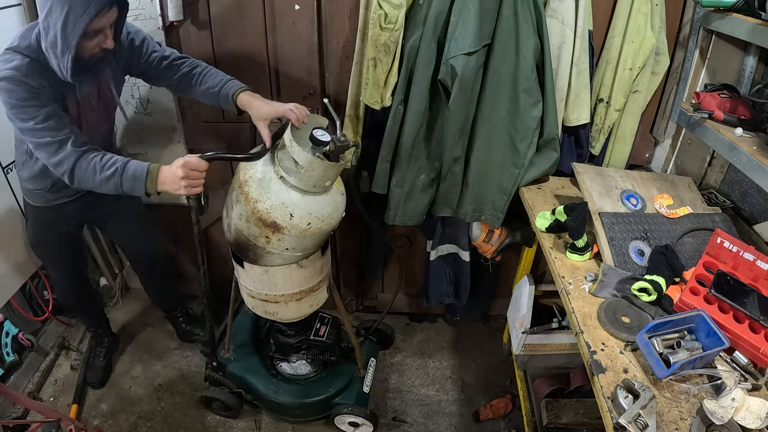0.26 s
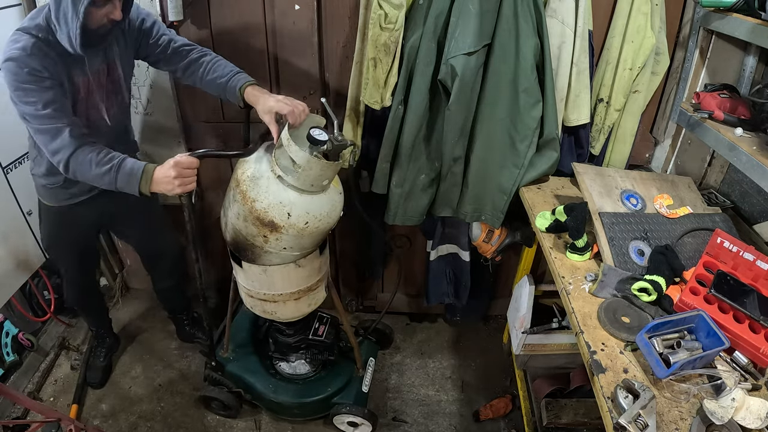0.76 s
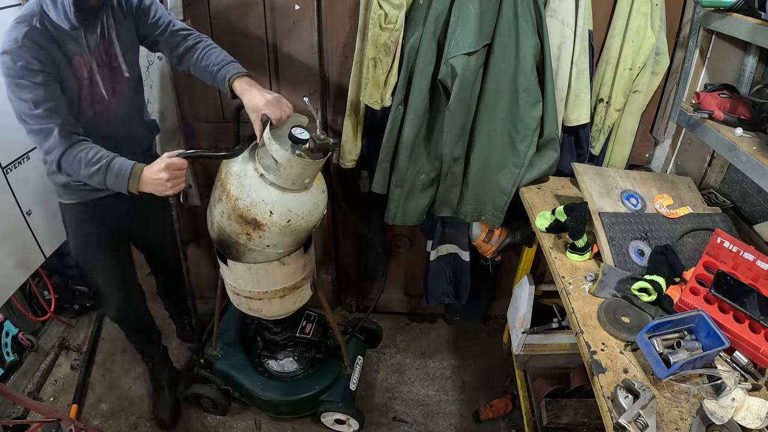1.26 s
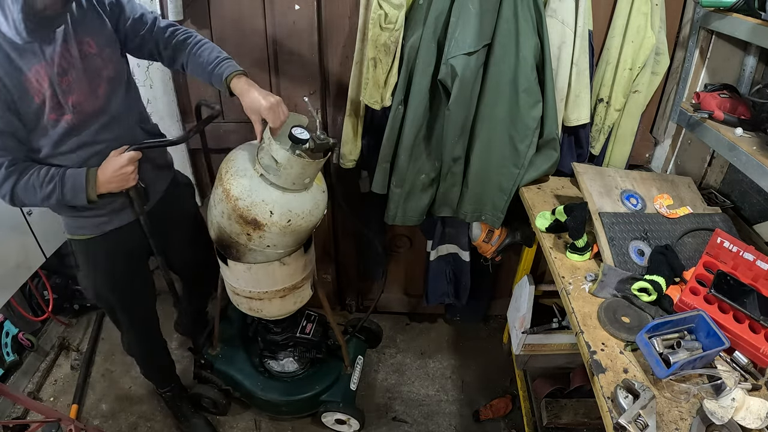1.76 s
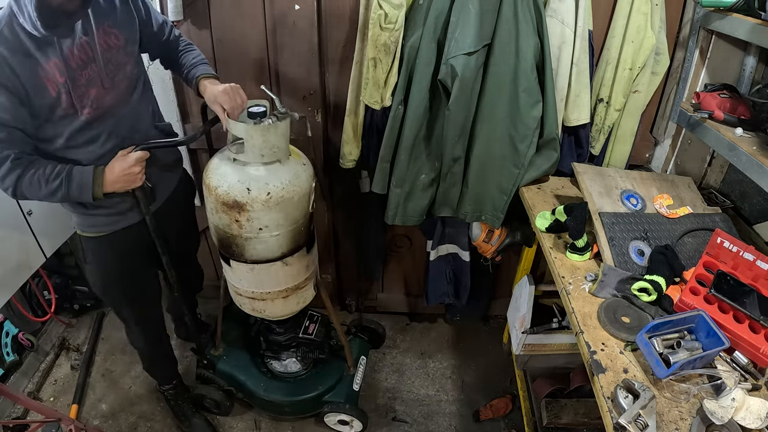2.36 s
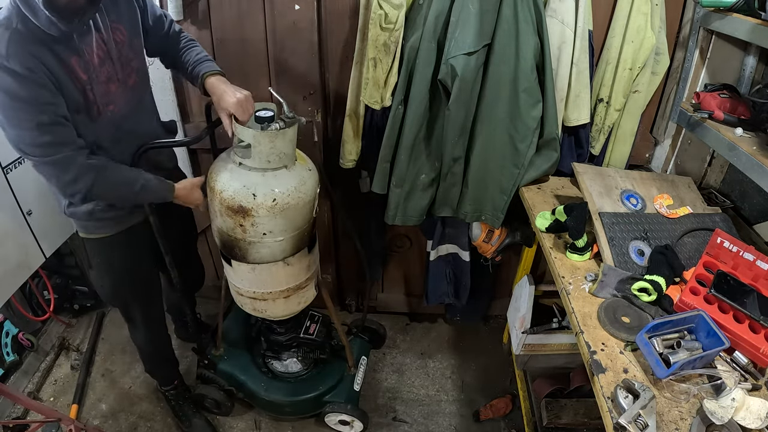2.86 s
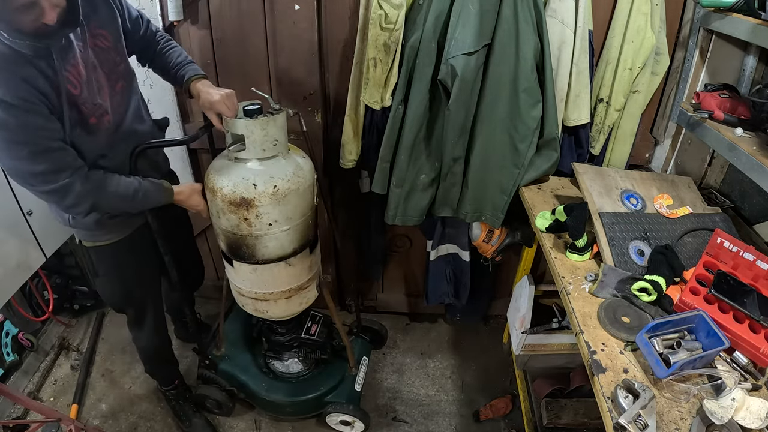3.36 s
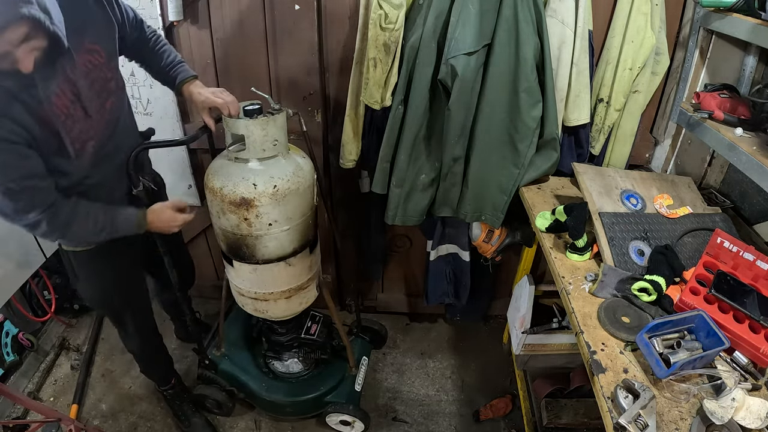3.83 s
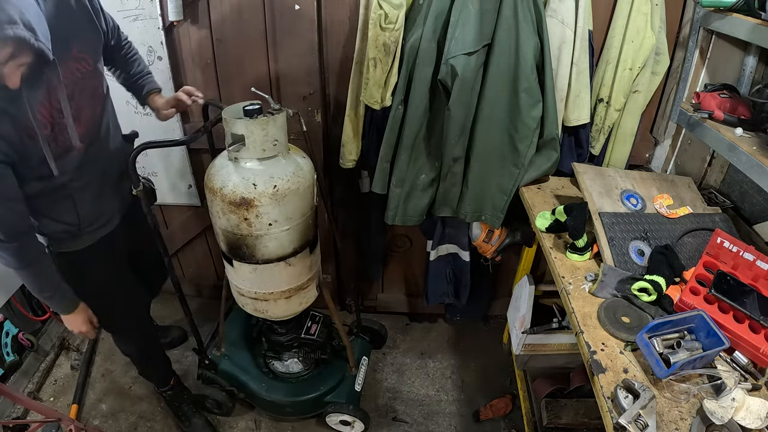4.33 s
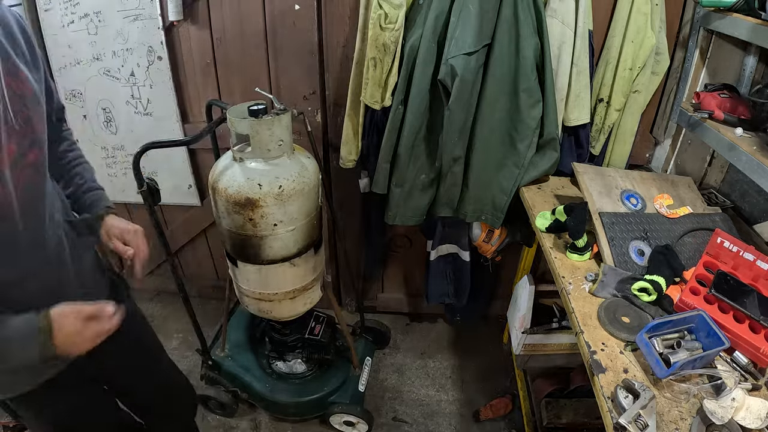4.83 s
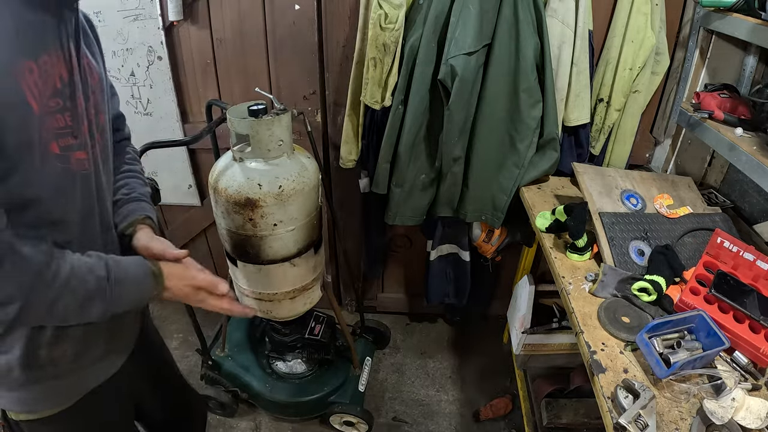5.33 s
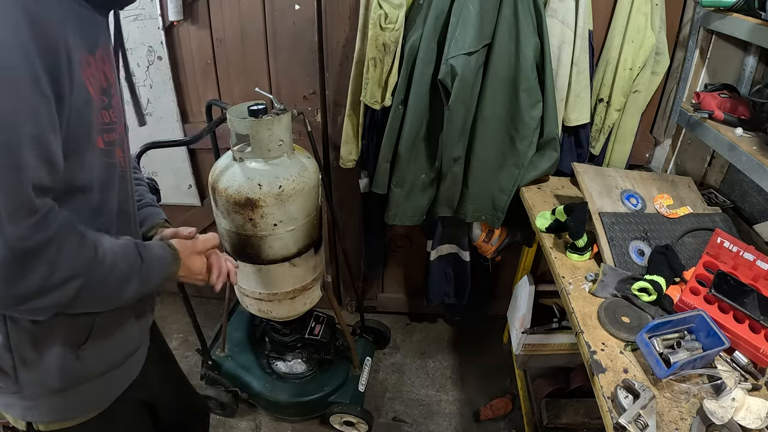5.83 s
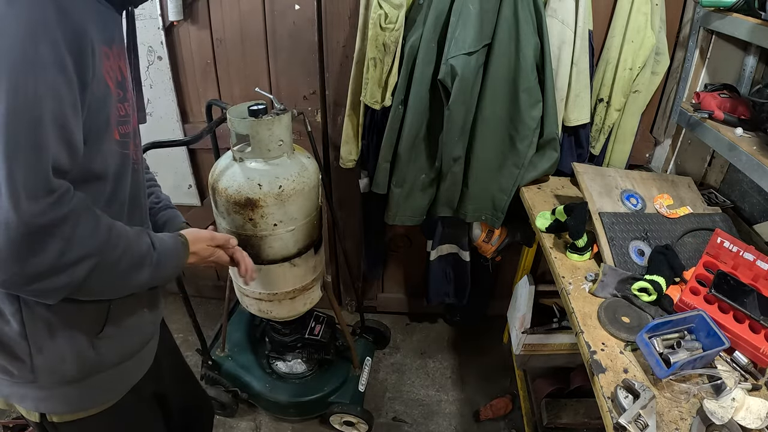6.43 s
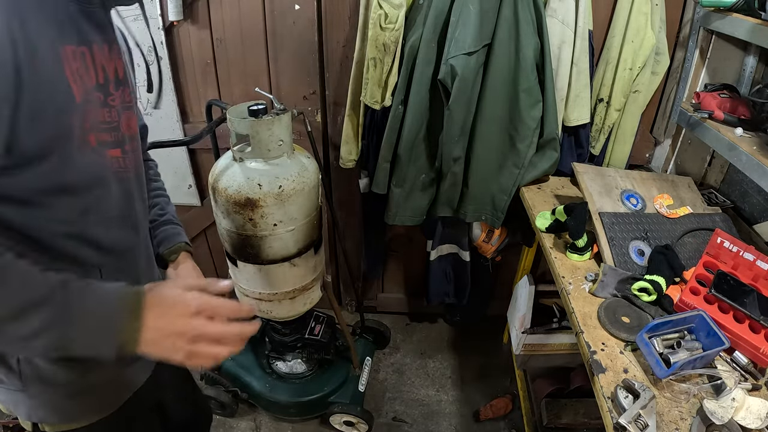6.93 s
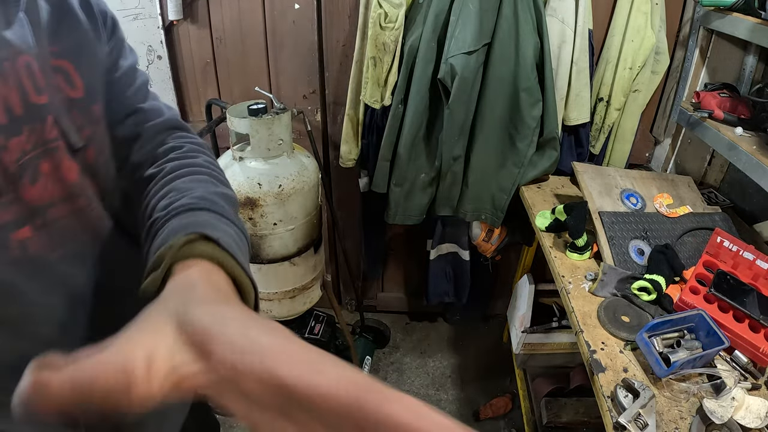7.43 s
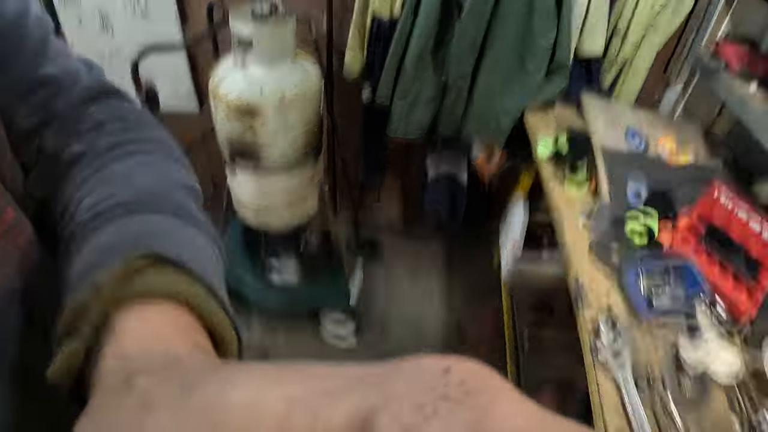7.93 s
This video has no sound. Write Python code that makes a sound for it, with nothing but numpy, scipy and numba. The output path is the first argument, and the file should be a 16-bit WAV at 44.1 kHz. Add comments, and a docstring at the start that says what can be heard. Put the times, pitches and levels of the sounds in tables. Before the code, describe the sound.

Rapid breathy puffs of compressed air from a small engine chug, slow and stall into a thin hiss, then a hand bumps the camera.

```python
"""Small mower engine turned over on compressed air

A cluttered workshop, with a one-cylinder mower close to the two microphone ports of a camera.
Each valve opening lets out a puff of jet noise that rings the muffler, while the rising piston glides
the cylinder's resonances, mostly upward. Thumps, low shaking and dull knocks come from the machine.
The strokes slow down, the engine stalls and hisses past its valve, and a hand grips the camera.
"""
import sys
import numpy as np
from scipy import signal
from scipy.fft import rfft, irfft
from scipy.io import wavfile
from scipy.ndimage import uniform_filter1d
from numba import njit

SR = 44100
rng = np.random.default_rng(int(sys.argv[2]) if len(sys.argv) > 2 else 0)


def materialize(psi):
    """Save the field psi as 16-bit PCM at rate SR to the path in sys.argv[1].

    A 1-D psi becomes a single channel; in a 2-D psi each row is a channel.
    """
    bounded = np.clip(np.atleast_2d(psi).T, -1, 1)
    quanta = np.round(bounded * 32767).astype(np.int16)
    wavfile.write(sys.argv[1], SR, quanta)


N = 360815
T = np.arange(N) / SR  # time [s]

# Valve openings, the two kinds of stroke in turn.
# Each row: start in seconds, open time in seconds, thump level in dB.
PUFFS = [(-0.146, 0.17, -58), (0.091, 0.16, -36), (0.346, 0.15, -30), (0.557, 0.17, -52),
         (0.818, 0.15, -34), (1.034, 0.17, -41), (1.297, 0.15, -27), (1.503, 0.16, -34), (1.757, 0.15, -32),
         (1.966, 0.18, -39), (2.224, 0.15, -26.5), (2.437, 0.17, -38), (2.701, 0.15, -28),
         (2.923, 0.17, -43), (3.196, 0.16, -31), (3.416, 0.19, -33), (3.72, 0.15, -32), (3.941, 0.19, -41),
         (4.234, 0.16, -30), (4.46, 0.19, -40), (4.76, 0.12, -39), (4.974, 0.36, -48), (5.58, 0.17, -37),
         (5.844, 0.46, -47), (6.547, 0.17, -39), (6.814, 0.44, -48)]
# The two kinds of stroke. Each row: nominal sag of the flow as the valve nears its seat in dB,
# displaced air relative to the jet in dB (before its final gain), air lost in dB per halving of speed.
STROKES = [(7.5, -12, 5), (2.5, -14.5, 12.5)]
# Muffler resonances over the jet. Each row: centre in Hz, nominal width in Hz, relative level in dB.
MUFFLER = [(1740.3, 38, 4), (1887, 13.3, -3.5), (2103, 41, -9), (2535, 57, -1), (2470, 15, -4.5),
           (4182, 68, -9.5), (4890, 20, -15), (5620, 42, -12), (5930, 30, -12.5), (6277, 67, -15.5),
           (6570, 60, -12.5), (7426, 250, -14.5), (7880, 230, -19.5), (9700, 98, -19), (9750, 250, -29.5),
           (10900, 210, -22.5), (11850, 175, -22), (12300, 250, -45)]
# Jet noise between the resonances. Each row: frequency in Hz, relative level in dB.
JET_COLOUR = [(1000, -38.5), (1550, -42), (1700, -5.5), (2050, -13.5), (2250, -13.5), (2700, -14.5),
              (3000, -26.5), (4100, -23), (7800, -29), (8600, -29.5), (9500, -26), (12500, -36.5),
              (14000, -42.5), (15700, -62)]
# Cylinder resonances in the jet. Each row: centre with piston down in Hz, centre with piston up in Hz,
# width in Hz before the filters widen it, relative level in dB.
CYLINDER = [(1872, 1993, 45, -2), (3930, 4350, 230, 5.5), (4555, 5100, 85, 6), (5370, 6310, 210, 6),
            (4960, 7700, 140, -7.5), (5800, 6800, 210, 0.5), (6596, 7200, 170, 3.5), (7000, 8200, 170, -3),
            (9050, 10400, 290, -1), (10360, 9900, 330, 3), (11500, 11000, 180, 2), (12350, 13000, 260, -1)]
# Quiet band in the puffs. One row: centre with piston down in Hz, centre with piston up in Hz,
# width in Hz, depth of each of two passes from 0 to 1.
QUIET_BAND = (3400, 3750, 900, .95)
# Low resonances of the displaced air. Each row: centre with piston down in Hz, centre with piston up
# in Hz, width in Hz before the filters widen it, relative level in dB.
WHOOP = [(140, 450, 133, -3), (158, 202, 51, -5.5), (342, 320, 170, -5.5), (563, 589, 41, -3.5),
         (570, 1083, 265, -5.5), (1046, 1770, 790, -5.5), (2950, 3500, 1200, -9)]
# Fixed low resonances of deck and tank. Each row: centre in Hz, nominal width in Hz, relative level in dB.
DECK = [(275, 70, 0), (641, 33, -3), (1140, 270, -4)]
# Air seeping past the seat. Each row: start in seconds, sealing time in seconds,
# starting level around 8-13 kHz in dB.
LEAKS = [(5.324, 5.47, -44), (6.304, 6.434, -44), (7.245, 8.3, -43)]
# Smooth colour of the leak. Each row: frequency in Hz, relative level in dB.
LEAK_COLOUR = [(180, -66), (300, -32), (907, -1.5), (1590, -5), (2690, -15), (3810, -4.5), (4210, -13.5),
               (6460, -6), (12100, -18), (15500, -39)]
# Resonances of the leak. Each row: centre in Hz, nominal width in Hz, relative level in dB.
LEAK_PEAKS = [(1810, 140, 5.5), (2030, 170, 2.5), (2486, 100, 0), (5060, 120, -4), (6370, 250, 0.5),
              (7230, 150, -4), (7610, 180, -1), (9310, 290, -2.5), (10150, 310, -8), (11840, 350, -9.5)]
# Last gasps as the slow valve reaches its seat. Each row: start in seconds, level in dB, length in seconds.
GASPS = [(5.419, -30.5, .07), (6.365, -29, 0.099)]
# Dull bumps of frame, tank and feet. Each row: start in seconds, level in dB before the decay,
# centre in Hz, 60 dB decay time in seconds.
BUMPS = [(0.214, -21.5, 189, 0.3), (1.26, -35.5, 380, 0.22), (2.068, -23.5, 274, 1.1),
         (2.664, -32.5, 183, 0.27), (3.292, -30.5, 400, 0.47), (5.575, -38, 85, 0.34),
         (5.588, -25.5, 149, 0.16), (7.347, -42, 200, 0.13), (7.35, -43, 60, 0.2), (7.54, -46, 140, 0.3)]
# Fingers on the camera body. Each row: start in seconds, relative tick level in dB, tick centre in Hz,
# relative thud level in dB.
TAPS = [(7.717, -13, 1190, -27), (7.785, -27, 1740, -33), (7.812, -10.5, 1630, -25), (7.89, -18, 1330, -34),
        (7.919, -14.5, 746, -17.5), (7.97, -33, 1720, -24.5), (8.027, -20.5, 1730, -22),
        (8.046, -16, 972, -22), (8.065, -18.5, 1190, -24), (8.102, -18, 604, -30), (8.122, -16.5, 976, -20)]
# Steady sound of the workshop. Each row: frequency in Hz, relative level in dB.
SHOP_COLOUR = [(30, -4), (100, -34), (400, 6.5), (2000, 6.5), (6000, 6), (15000, -13)]
# Left port minus right port for airborne sound. Each row: frequency in Hz, difference in dB.
PORTS = [(40, -3.5), (130, -2.5), (600, -1), (1500, 1.5), (4500, 1.4), (9000, 1.5), (15000, 4)]
# Dip of the camera housing for airborne sound. Each row: frequency in Hz, gain in dB.
HOUSING = [(65, -0.5), (105, -9), (140, 0.5)]

JET_DB, JET_FALL_DB_S = -21.5, 0.1865  # the tank pressure drops slowly
BRISK_CYCLE_S, LAST_CYCLE_S = 0.51, 0.9  # time over two strokes
STALL_SHUT_DB = 34  # per open time: the stalled crank closes the last valve only slowly
SIZZLE_HZ, SIZZLE_DB, SIZZLE_RISE_DB_S = 13200, -9.5, 0.95  # the top of the jet grows as the strokes slow
# slow strokes clear the gap between the low rings
GAP_HZ, GAP_WIDTH_HZ, GAP_FROM_S, GAP_SHARE = 2250, 220, 4.4, 0.55
THIN_HZ, THIN_SHARE = 190, 0.52  # a risen piston leaves little room for the lowest resonances
SEEP_RISE_S, SEEP_DROOP_DB_S, SEAL_DB_S = 0.07, 1, 500
SHAKE_DB, SHAKE_FALL_DB_S = -44, 5  # shaking of the mower as it slows, before its wavering
ROCK_DB, ROCK_T60_S = -12, 0.55  # rocking after each valve opening, relative to the thump
STILL_DB = -74.5  # low shaking left when the mower stands still
GRIP_S, GRIP_DB = 7.68, -36  # steady hold, before its wavering and the path to each port
GRIP_JOLT_DB, GRIP_T60_S = -6, 0.17  # jolt of the grip with each tap, relative to the thud column
ROOM_T60_S, ROOM_DB, ROOM_LOW_HZ = 0.072, -4.5, 40.6
SHOP_DB = -47.5  # before the ports
TOP_HZ = 15700


def undb(db):
    """Amplitude of a level in dB."""
    return 10 ** (np.asarray(db) / 20)


def unit(x):
    """Signal scaled to an RMS of 1."""
    return x / np.sqrt(np.mean(x ** 2))


def spectrum(points, hz):
    """dB of (Hz, dB) points, straight on a log-frequency axis."""
    f, db = np.transpose(points)
    return np.interp(np.log(hz + 1), np.log(f), db)


def noise(points, peaks=(), peaks_db=0.):
    """Noise coloured by a smooth spectrum plus resonance peaks."""
    hz = np.fft.rfftfreq(N, 1 / SR)
    power = undb(2 * spectrum(points, hz))
    for centre, width, db in peaks:
        skirt = (1 + (2 * (hz - centre) / width) ** 2) ** 1.84
        power = power + undb(2 * (db + peaks_db)) / skirt
    white = rfft(rng.standard_normal(N))
    return irfft(white * np.sqrt(power), N)


@njit
def svf(x, hz, width):
    """State-variable band-pass with a moving centre, gain 1 at the centre."""
    y, b, l = np.empty(len(x)), 0., 0.
    for i in range(len(x)):
        g, k = np.tan(np.pi * hz[i] / SR), width / hz[i]
        v = (b + g * (x[i] - l)) / (1 + g * (g + k))
        b, l, y[i] = 2 * v - b, l + 2 * g * v, k * v
    return y


def band(x, hz, width):
    """Band-pass with a fixed centre."""
    return svf(x, np.full(len(x), 1. * hz), 1. * width)


def walk(rate):
    """Random levels held 1 / rate s and slewed twice; spread near 1."""
    k = int(SR / rate)
    steps = np.repeat(rng.standard_normal(N // k + 1), k)
    return 1.064 * uniform_filter1d(uniform_filter1d(steps, k), k)[:N]


def add(out, s, sound):
    """Mix a short sound into out at s seconds."""
    i = int(s * SR)
    out[i:i + len(sound)] += sound[:N - i]


def jolts(events, t60, rise_s):
    """Gain that swells at each (s, dB) and dies away."""
    starts, db = np.array(events).T
    t = np.maximum(T[:, None] - starts, 0)
    return np.clip(t / rise_s, 0, 1) * 1000 ** (-t / t60) @ undb(db)


def gliding(source, modes, piston, patchy_db):
    """Steep resonances whose pitch follows the piston; each wavers and flares on its own."""
    out = 0
    for down_hz, up_hz, width, db in modes:
        hz = (down_hz + (up_hz - down_hz) * piston) * (1 + 0.026 * walk(14))
        flare = undb(db + patchy_db * walk(22.01))
        # two passes narrow the band, so each is set wider
        once = svf(source, hz, 2.28 * width)
        out = out + flare * svf(once, hz, 2.28 * width)
    return out


def valve(rise_s=0.023, shut_db=55, whoop_lag_s=0.098):
    """Controls of all strokes: jet level, flow, displaced-air gain, piston height 0-1."""
    flow_db, air, piston = np.full(N, -90.), np.zeros(N), np.ones(N)
    jet_db = JET_DB - JET_FALL_DB_S * T
    times = np.array(PUFFS)[:, 0]
    cycles = np.r_[BRISK_CYCLE_S, times[2:] - times[:-2], LAST_CYCLE_S]
    for k, (s, open_s, _) in enumerate(PUFFS):
        sag_db, air_db, lost_db = STROKES[k % 2]
        air_db = air_db - lost_db * np.log2(cycles[k] / BRISK_CYCLE_S)
        if k == len(PUFFS) - 1:
            shut_db = STALL_SHUT_DB
        on = T >= s
        t = T[on] - s
        u = t / open_s
        # the cam lifts the valve, the flow sags as it nears its seat, and a slow crank pinches it off slowly
        lift = 35 * np.log10(np.clip(t / rise_s, 1e-4, 1))
        sag = sag_db * np.clip(u, 0, 1) ** 7.3
        pinch = shut_db * np.maximum(u - 1, 0)
        shape = lift - sag - pinch
        flow_db[on] = np.maximum(shape, -90)
        lag = 1 - 0.42 * np.exp(-t / whoop_lag_s)
        air[on] = undb(jet_db[on] + air_db + 0.55 * shape) * lag
        piston[on] = np.sin(np.pi / 2 * np.clip(t / (0.97 * open_s), 0, 1)) ** 2.05
    return jet_db, flow_db, air, piston


def jet_noise(piston):
    """Turbulent jet ringing the muffler and the cylinder, at a steady mean level."""
    muffled = noise(JET_COLOUR, MUFFLER, peaks_db=-1.)
    cylinder = gliding(muffled, CYLINDER, piston, patchy_db=5.0)
    jet = unit(muffled + cylinder) * undb(1.09 * walk(30))
    jet = jet + undb(SIZZLE_DB + SIZZLE_RISE_DB_S * T) * band(jet, SIZZLE_HZ, 3800)
    gap = GAP_SHARE * np.clip(T - GAP_FROM_S, 0, 1)
    return jet - gap * band(jet, GAP_HZ, GAP_WIDTH_HZ)


def displaced_air(piston):
    """Air pushed out by the piston, sounding low resonances that move with its height."""
    push = noise([(60, -49), (150, -11), (1500, -2.0), (15000, -0.5)], DECK, peaks_db=0.5)
    whoop = unit(gliding(push, WHOOP, piston, patchy_db=2.5))
    return whoop - THIN_SHARE * piston ** 3.0 * band(whoop, THIN_HZ, 300)


def engine():
    """Jet and displaced air under valve control, thinned in a quiet band around 3.4-3.75 kHz."""
    jet_db, flow_db, air, piston = valve()
    jet = jet_noise(piston)
    low = signal.sosfiltfilt(signal.butter(2, 3300, fs=SR, output="sos"), jet)
    # treble needs a fast jet, so it dies sooner than the low muffler rings
    out = undb(jet_db) * (low * undb(0.94 * flow_db) + (jet - low) * undb(1.11 * flow_db))
    out += air * displaced_air(piston) * undb(6.5)
    down_hz, up_hz, width, depth = QUIET_BAND
    quiet_hz = down_hz + (up_hz - down_hz) * piston
    # the 3-4 kHz band thins after each puff's onset and partly returns late in it
    thinning = np.clip(np.minimum(0.4 + piston / 0.09, 0.5 + (1 - piston) / 0.15), 0, 1)
    for _ in range(2):
        out = out - depth * thinning * svf(out, quiet_hz, 1. * width)
    return out


def leak():
    """Thin hiss past the valve seat: it swells, droops, and stops when the valve seals."""
    hiss = noise(LEAK_COLOUR, LEAK_PEAKS, peaks_db=4.0)
    hiss /= np.std(band(hiss, hz=10220, width=4740))
    gain = 0
    for s, sealed, db in LEAKS:
        droop = SEEP_DROOP_DB_S * np.maximum(T - s, 0)
        seal = SEAL_DB_S * np.maximum(T - sealed, 0)
        gain = gain + np.clip((T - s) / SEEP_RISE_S, 0, 1) * undb(db - droop - seal)
    return hiss * undb(2.0 * walk(16)) * gain


def gasps():
    """Broad, breathy swells of air noise, without the quiet band of the puffs."""
    colour = [(800, -29), (1750, 20.5), (2500, -13), (4000, -1), (7000, -1), (10000, -32)]
    hiss = unit(noise(colour, LEAK_PEAKS[:3], peaks_db=1.0))
    gain = 0
    for s, db, length in GASPS:
        gain = gain + undb(db) * np.sin(np.pi * np.clip((T - s) / length, 0, 1)) ** 0.81
    return hiss * gain


def thumps(delay_s=0.01):
    """A low pressure thump just after each valve opens, over the shaking of the mower."""
    out, t = np.zeros(N), T[:SR // 10]
    thump = np.sin(2 * np.pi * 48 * t) * np.sin(np.pi * np.clip(t / 0.027, 0, 1)) ** 2
    for s, _, db in PUFFS[1:]:  # the first valve opens before the start
        add(out, s + delay_s, undb(db) * thump)
    shake = unit(band(band(rng.standard_normal(N), 52, 99), 52, 99))
    rock = jolts([(s, db + ROCK_DB) for s, _, db in PUFFS], ROCK_T60_S, rise_s=0.013)
    gain = undb(STILL_DB) + undb(SHAKE_DB - SHAKE_FALL_DB_S * T) + rock
    return out + shake * gain * undb(2.2 * walk(12))


def bumps():
    """Bursts of noise ringing in a low, wide resonance."""
    out, t = np.zeros(N), T[:SR]
    for s, db, hz, t60 in BUMPS:
        ring = unit(band(band(rng.standard_normal(len(t)), hz, 0.92 * hz), hz, 0.92 * hz))
        decay = np.clip(t / 0.004, 0, 1) * 1000 ** (-t / t60)
        add(out, s, undb(db) * ring * decay)
    return out


def hand():
    """Ticks and thuds conducted through the camera body, over the rumble of the grip."""
    out, t = np.zeros(N), T[:SR // 10]
    for s, db, hz, thud_db in TAPS:
        tick = unit(band(band(rng.standard_normal(len(t)), hz, 1.13 * hz), hz, 1.4 * hz))
        tick = tick * (1000 ** (-t / 0.019) + 0.51 * 1000 ** (-t / 0.084))  # a crack, then the case rings
        thud = np.sin(2 * np.pi * 110 * t) * np.clip(t / 0.0017, 0, 1) * 1000 ** (-t / 0.056)
        add(out, s, undb(db - 5.5) * tick + undb(thud_db + 7.0) * thud)
    colour = [(15, -16), (60, -11.5), (150, -6.0), (400, -17.5), (1500, -26.5), (8000, -51)]
    rumble = unit(noise(colour))
    hold = undb(GRIP_DB) * np.clip((T - GRIP_S) / 0.016, 0, 1)
    jolt = jolts([(s, db + GRIP_JOLT_DB) for s, *_, db in TAPS], GRIP_T60_S, rise_s=0.005)
    return out + rumble * (hold + jolt) * undb(6.8 * walk(40))


def room(x):
    """Each port hears its own decaying scatter from walls and benches, with little deep bass."""
    t = T[:SR // 2]
    tails = rng.standard_normal((2, len(t))) * 1000 ** (-t / ROOM_T60_S) * (t > .002)
    tails = signal.sosfilt(signal.butter(1, ROOM_LOW_HZ, "high", fs=SR, output="sos"), tails)
    tails += 0.39 * np.diff(tails, prepend=0.)  # hard surfaces scatter the treble most
    tails /= np.sqrt(np.sum(tails ** 2, axis=1, keepdims=True))
    return undb(ROOM_DB) * signal.fftconvolve(x[None], tails, axes=1)[:, :N]


def workshop():
    """Steady background noise of the place, independent at each port."""
    return undb(SHOP_DB) * np.array([unit(noise(SHOP_COLOUR)), unit(noise(SHOP_COLOUR))])


def at_ports(airborne):
    """Airborne sound coloured by the housing and by the two unlike microphone ports."""
    hz = np.fft.rfftfreq(N, 1 / SR)
    port_db = spectrum(HOUSING, hz) + np.outer([.5, -.5], spectrum(PORTS, hz))
    return irfft(rfft(airborne, axis=1) * undb(port_db), N, axis=1)


def scene():
    """Mower, room and workshop through the air, and the hand through the case."""
    mower = engine() + leak() + gasps() + bumps() + thumps()
    heard = at_ports(mower + room(mower) + workshop())
    grip = hand()
    direct = grip * undb([[-3.0], [1.2]])
    # the grip also comes a moment late through the case, mostly to the left port
    late = np.roll(grip, 130) * undb([[-7], [-30]])
    return heard + direct + late


def record(dry):
    """The camera cuts the top with a steep low-pass."""
    return signal.sosfilt(signal.ellip(12, .2, 60, TOP_HZ, fs=SR, output="sos"), dry)


dry = scene()
out = record(dry)
materialize(out)
```